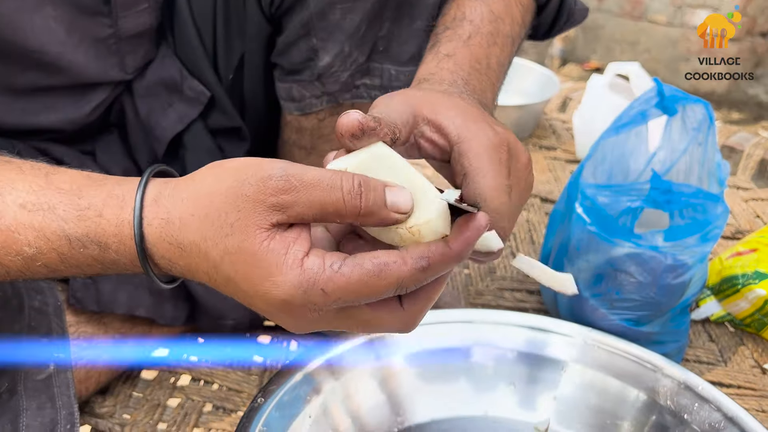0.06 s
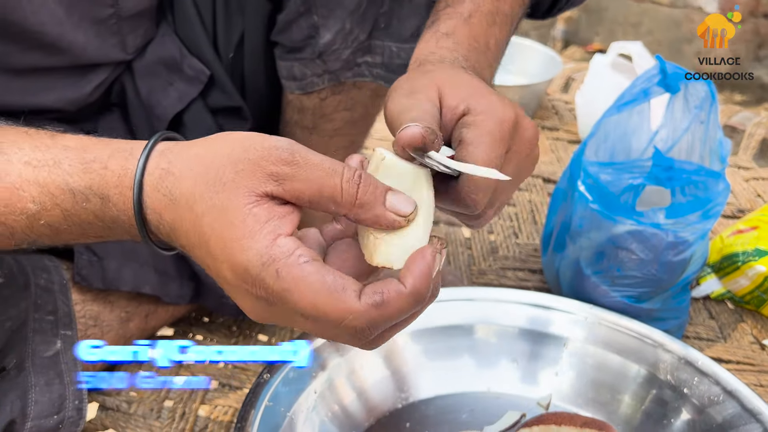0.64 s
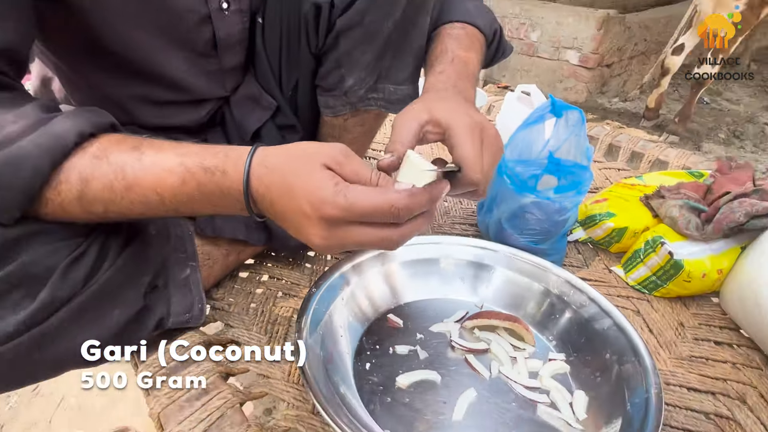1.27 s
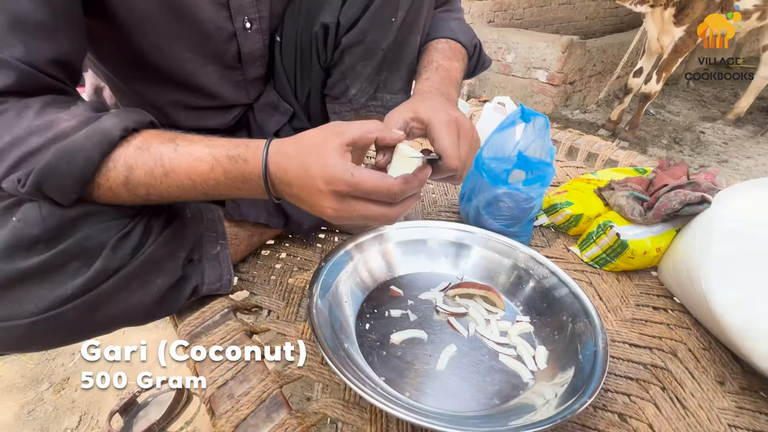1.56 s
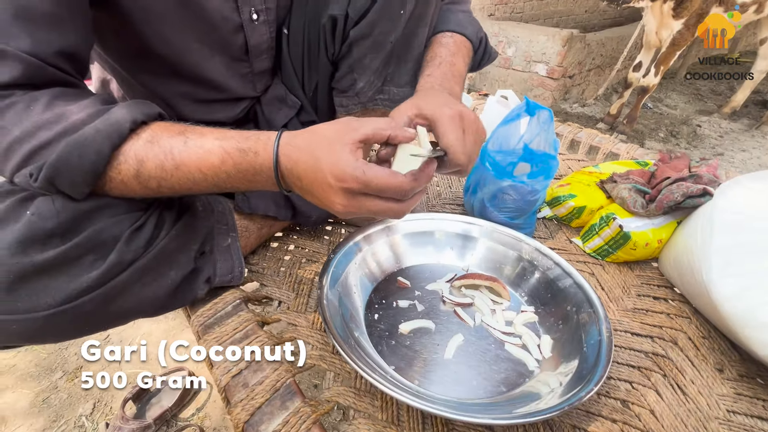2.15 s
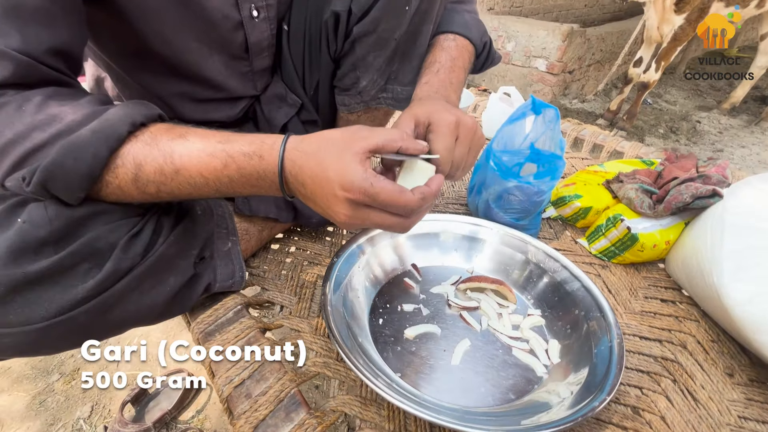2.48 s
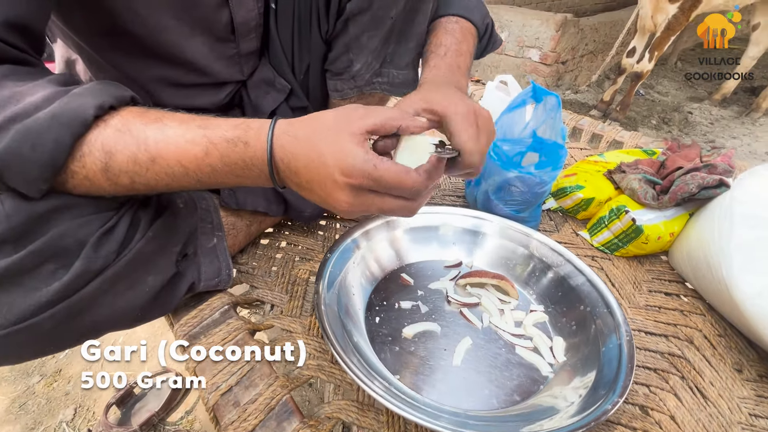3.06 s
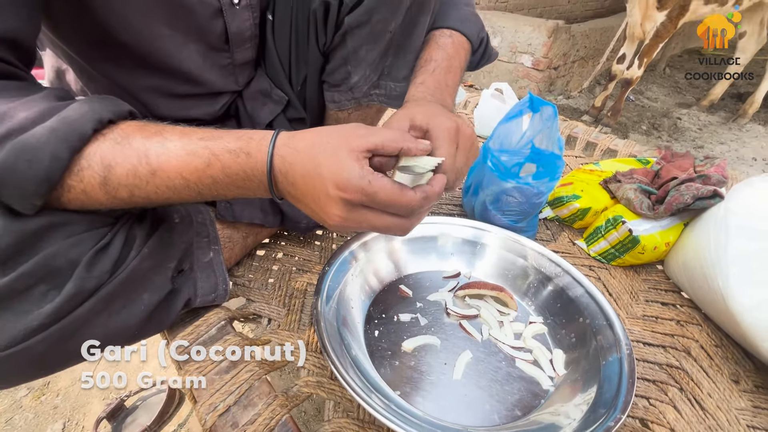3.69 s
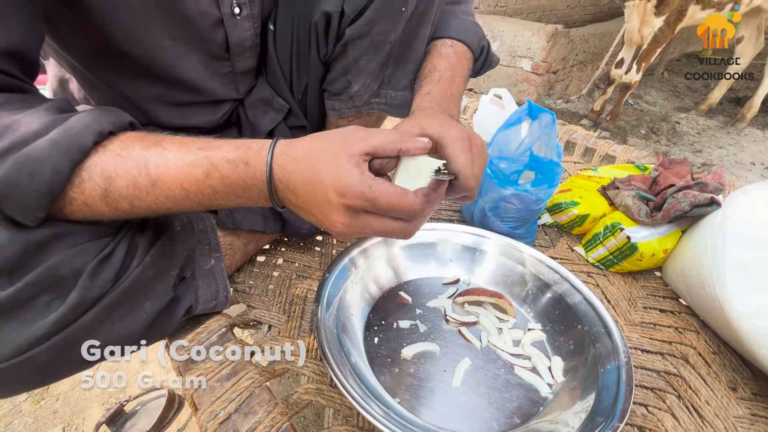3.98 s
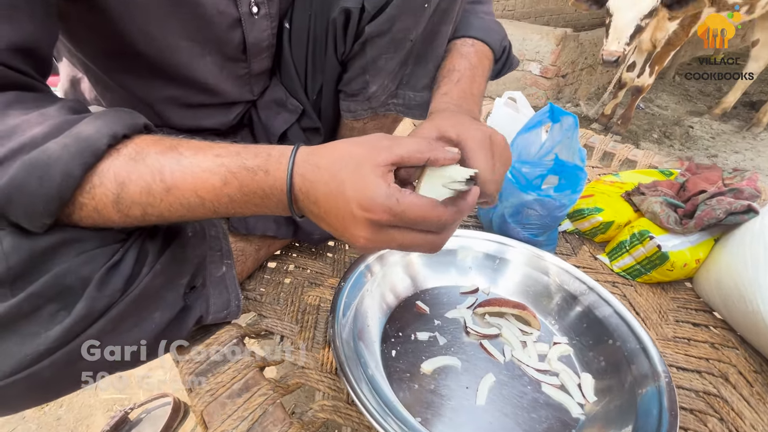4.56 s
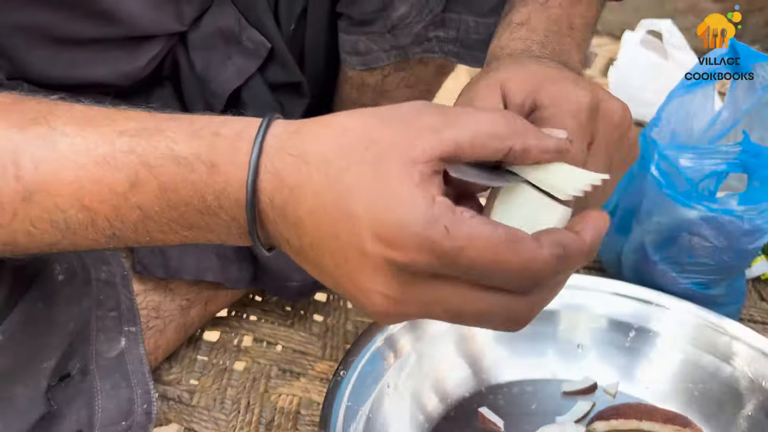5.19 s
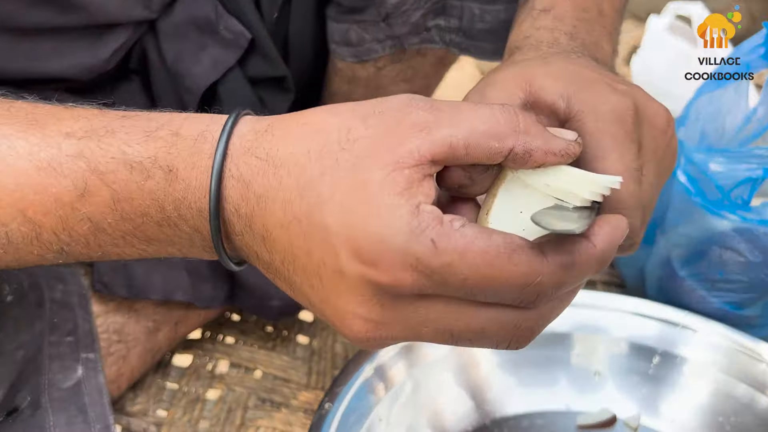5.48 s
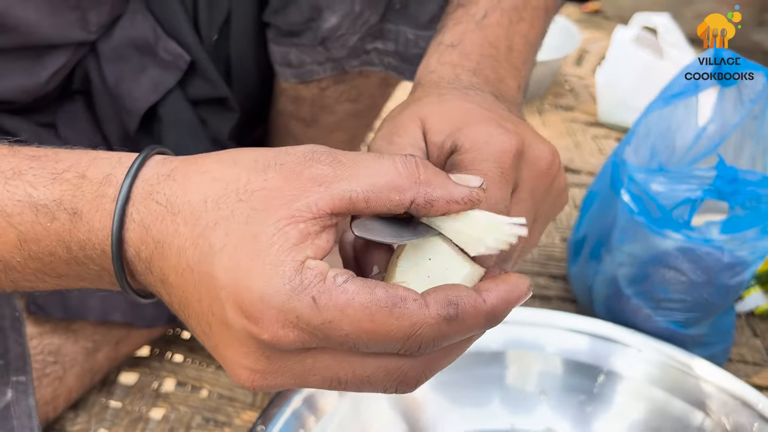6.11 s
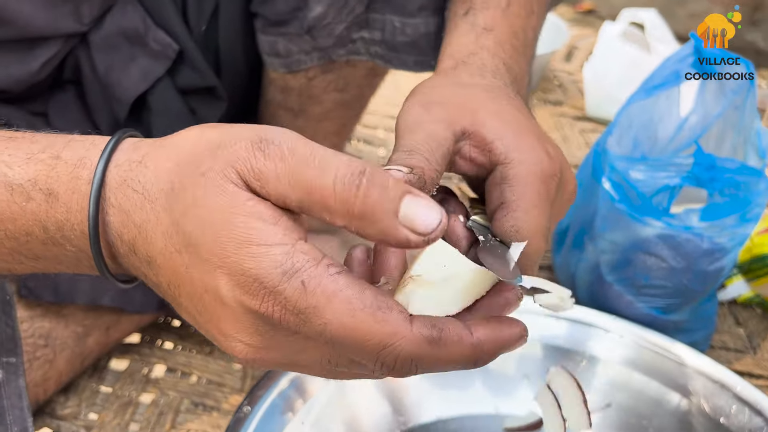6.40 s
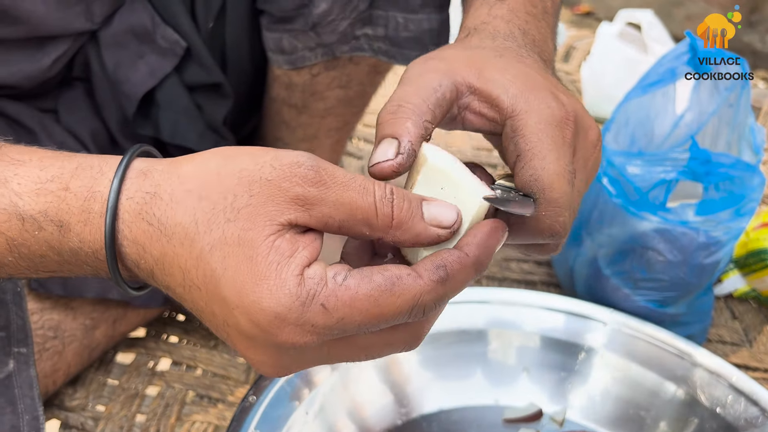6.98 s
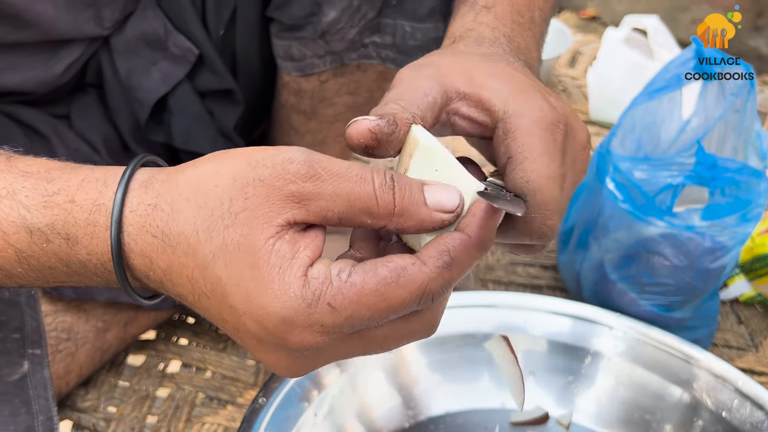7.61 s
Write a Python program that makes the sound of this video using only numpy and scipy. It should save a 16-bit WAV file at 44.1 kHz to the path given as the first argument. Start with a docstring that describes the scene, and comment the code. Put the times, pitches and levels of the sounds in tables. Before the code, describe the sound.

Crisp cuts into hard coconut and ringing clinks of pieces landing on a metal plate, outdoors among faint birds.

```python
"""In an open yard, small birds whistle over a low rumble while a small knife scrapes at dried coconut.
Slices drop onto a wide steel plate, bounce and leave it ringing, and a crow caws far away.
After a second the microphone steps back; the blade crunches on, snapping the hard fibres push by push.
Another slice lands, the birds get busier, and near 5 s the microphone comes close again.
At 6.5 s the heaviest piece makes the whole plate thump; one more cut and a last clink follow."""
import sys
import numpy as np
from scipy import signal
from scipy.fft import rfft, irfft
from scipy.io import wavfile
from scipy.ndimage import uniform_filter1d

SR = 44100
rng = np.random.default_rng(int(sys.argv[2]) if len(sys.argv) > 2 else 0)


def master(y):
    """Save y as 16-bit WAV."""
    cut = np.clip(np.atleast_2d(y).T, -1, 1)
    pcm = np.round(cut * 32767)  # scale
    wavfile.write(sys.argv[1], SR, pcm.astype(np.int16))


N = 346185

# Pushes of the blade, light or hard. Each row: start in seconds, length in seconds, force in dB.
BLADE_PUSHES = [(0.006, 0.073, -52.5), (.16, 0.15, -47), (0.425, 0.13, -49.5), (.63, .05, -61.5),
                (1.679, 0.22, -45), (2.201, 0.24, -46), (2.617, 0.22, -42.5), (2.96, 0.099, -60),
                (3.139, 0.18, -40.5), (3.413, 0.094, -60.5), (3.589, 0.18, -40), (3.82, 0.19, -65.5),
                (4.05, .15, -43), (4.377, 0.095, -58), (4.537, 0.16, -40.5), (4.889, 0.058, -51),
                (5.012, 0.16, -40.5), (5.284, 0.061, -44.5), (5.41, 0.22, -42.5), (5.68, 0.1, -67),
                (5.794, 0.05, -50), (5.965, 0.055, -57.5), (6.035, .1, -42.5), (7.32, 0.14, -41),
                (7.577, 0.059, -53)]
# Larger cracks ahead of the blade. Each row: start in seconds, relative peak level in dB.
COCONUT_CRACKS = [(.547, -49), (0.585, -43), (1.73, -40), (1.7822, -42), (1.887, -37), (1.9187, -32.5),
                  (2.252, -44.5), (2.877, -28.5), (3.2315, -35.5), (3.3443, -28.5), (3.796, -36),
                  (4.081, -34), (4.113, -34), (4.138, -39), (4.279, -29), (4.753, -34.5), (5.036, -41),
                  (5.3215, -33.5), (5.6275, -51), (5.6555, -30.5), (6.0548, -38), (6.0847, -33),
                  (6.119, -35), (7.261, -47.5), (7.289, -44), (7.321, -42.5), (7.355, -38), (7.383, -40.5),
                  (7.726, -43)]
# The tone of the crunch from nearby and from farther back. Each row: frequency in Hz, level in dB.
CRUNCH_NEAR = [(1470, -9), (2500, -9), (4370, -2.5), (7190, -2), (9080, -2.5), (9890, -16), (11800, -3),
               (13800, 0.5), (15200, -6), (16000, -4)]
CRUNCH_FAR = [(880, -14), (1500, -14.5), (2830, -6.5), (3590, -16.5), (4290, -6.5), (7690, -5), (9010, 3),
              (10800, -7), (13900, -4), (16000, -5)]


def cutting(level_db=-1.5, snaps_per_s=800, snap_s=0.0027, hiss=0.74, crack_db=-5, crack_s=0.0025):
    """Fibres part in a dense run of tiny snaps as the blade advances, with a larger crack now and then."""
    pressure = np.zeros((1, N))
    for start, length, force_db in BLADE_PUSHES:
        add(pressure, start, push(length, force_db))
    snaps = (rng.random(N) < snaps_per_s / SR) * amp(3 * np.minimum(rng.exponential(1, N), 3))
    grains = signal.lfilter([1], [1, -np.exp(-1 / (snap_s * SR))], snaps)  # each snap dies away
    loudness = unit(unit(grains) + hiss) * stick_slip() * pressure * amp(level_db)
    t = np.arange(2048) / SR
    crack = t / crack_s * np.exp(1 - t / crack_s)
    for start, db in COCONUT_CRACKS:
        add(loudness, start, amp(db + crack_db) * crack[None])
    far, noise = far_share(), stereo_noise(N, likeness=0.63)
    tone = (1 - far) * unit(colour(noise, CRUNCH_NEAR)) + far * unit(colour(noise, CRUNCH_FAR))
    crunch = loudness * tone
    return crunch + amp(-15) * yard_echo(crunch, t60=0.063)


def push(length, force_db, soft_start_db=-21, build_share=0.59, release_db_per_s=643.5):
    """Pressure on the blade builds, holds, and drops when the coconut gives way."""
    t = np.arange(0, length + .1, 1 / SR)
    still_to_build = np.maximum(1 - t / (build_share * length), 0)
    release_db = release_db_per_s * np.maximum(t - length, 0)
    return amp(force_db + soft_start_db * still_to_build - release_db)[None]


def stick_slip(depth_db=3.5):
    """The blade catches and lets go every few milliseconds."""
    return unit(amp(depth_db * unit(uniform_filter1d(rng.standard_normal(N), 260))))


# Slices landing and bouncing. Each row: start in seconds, then strength, weight of the flat face,
# sharpness of the edge and long ring, all in dB. Lying flat muffles the ring; a hit near the rim frees it.
SLICE_LANDINGS = [(0.2425, -44.5, 9.5, 0, 4), (0.254, -35, -20, -2, 0), (0.3053, -22, -9.5, 6.5, -1),
                  (0.319, -27.5, -27, 5.5, 2.5), (0.373, -43.5, 2.5, 8, -12), (1.013, -35.5, 6, -7.5, -4),
                  (1.0205, -20, -14.5, 1.5, -7), (1.0615, -26, -7.5, 5.5, -1.5),
                  (1.16, -36.5, -15, -22, 14), (1.262, -41, -15.5, -18, -15), (1.308, -44, -12.5, -12, 11),
                  (2.4243, -16.5, -5, -9, -3), (2.544, -47, 10.5, 9, -1), (2.562, -21.5, -19.5, -2.5, -8),
                  (2.636, -49, -0.5, 17, 1.5), (2.692, -44, -5, 3.5, 21), (6.513, -46, 2, -1, 0),
                  (6.5275, -17.5, -17.5, -6.5, 9.5), (6.5362, -13.5, -11, -1, 8),
                  (6.585, -24.5, -8, 5.5, 1.5), (6.606, -10.5, -18.5, -14.5, -9.5),
                  (6.695, -39.5, -5.5, 10.5, -4), (6.8605, -38, -3.5, -2.5, -6), (6.942, -53, -1, 3.5, -11),
                  (7.7492, -21, -13.5, 4.5, -10), (7.768, -52, -6, 31, 6)]
# The thud, knock, clank, clink and tick of a landing. Each row: lowest and highest frequency in Hz.
LANDING_BANDS = [(150, 380), (380, 1200), (1200, 3500), (3500, 9000), (9500, 16500)]
# How those five bands answer a hit. Each row: level in dB, share of the weight, share of the sharpness,
# left minus right in dB.
BAND_ANSWERS = [(-11.5, 0.73, 0.2, -0.5), (0, 0.96, 0, 4.5), (2, 0.055, 0.015, 0.5), (0, 0, 0.99, 1),
                (-7, 0.013, 0.76, -0.2)]


def landings(level_db=-1.9, rise_s=0.0009, chatter=0.12, chatter_s=0.011, tap_db=2, tap_s=0.00058):
    """Each slice rings the plate: a hard edge brings out the treble, a flat face the low notes."""
    out, t = np.zeros((2, N)), np.arange(1 << 15) / SR
    hz, mode_db, t60, waves = plate_modes(t)
    lasting = np.minimum(t60 / .42, 1) ** 2  # notes lasting 0.42 s or more are muffled or freed fully
    fade_in_out = (1 - np.exp(-t / rise_s)) * np.minimum(1, 10 * (t[-1] - t))
    for start, strength_db, weight_db, sharp_db, ring_db in SLICE_LANDINGS:
        ring = plate_ring(t, hz, mode_db + ring_db * lasting, waves) * fade_in_out
        ring += amp(tap_db) * np.exp(-t / tap_s) * rng.standard_normal(len(t))
        # a curved slice touches again a few milliseconds after it lands
        delay = int(chatter_s * rng.uniform(.5, 1) * SR)
        ring += chatter * np.pad(ring, ((0, 0), (delay, 0)))[:, :len(t)]
        for (lo, hi), (db, by_weight, by_edge, left_db) in zip(LANDING_BANDS, BAND_ANSWERS):
            gain = amp(strength_db + db + by_weight * weight_db + by_edge * sharp_db)
            balance = amp([[left_db / 2], [-left_db / 2]])
            add(out, start, gain * balance * unit_attack(band(ring, lo, hi)))
    return out * amp(level_db)


# The plate's clear notes (modes). Each row: pitch in Hz, relative level in dB,
# seconds to fade by 60 dB (called t60).
CLEAR_MODES = [(200, -13, 0.1), (535, -13, 0.22), (1130, -7, 0.08), (1432, -5, 0.09), (1787, 0, 0.12),
               (1829, 2.5, 0.13), (1959, -13, 0.55), (2005, -7, 0.33), (2085, -3, 0.24), (2116, -17, 0.7),
               (2288, -4, 0.1), (2508, -6, 0.08), (2622, -1, 0.13), (2671, -2, 0.13), (2988, -23, 0.6),
               (3054, -4, 0.14), (3453, -7, 0.13), (3499, -5, 0.14), (3622, -11, 0.25), (3639, -27, 1.6),
               (3815, -12, 0.2), (3822, -33, 1.1), (4265, -6, 0.13), (4549, -2, 0.18), (4705, 0, 0.16),
               (4975, -5, 0.25), (5230, -3, 0.17), (5566, -13, 0.37), (5967, -7, 0.2), (6469, -5, 0.16),
               (7199, -6, 0.22), (7505, -7, 0.2), (8027, -19, 0.42), (8619, -5, 0.15)]
# The tone of its crowd of weaker notes. Each row: frequency in Hz, relative level in dB.
CROWD_TONE = [(88, -41), (150, -18.5), (222, -3.5), (431, -33.5), (534, -11.5), (820, -21.5), (1100, -20),
              (1600, -16), (1790, -2), (2650, -9), (2810, -18.5), (4860, -8), (7470, -15), (10000, -29.5),
              (12900, -28.5), (16000, -35)]
# How long that crowd rings. Each row: frequency in Hz, typical t60 in seconds.
CROWD_FADE = [(200, 0.11), (1000, 0.062), (2500, 0.061), (5500, 0.45), (9000, 0.39), (14000, 0.039)]


def plate_modes(t, count=320, crowd_db=-13, scatter_db=4, t60_scatter=0.12):
    """Steel rings at many pitches at once, each a fading wave in a sine and a cosine version."""
    hz = rng.uniform(500, 16000, count)
    peak_db = max(db for _, db in CROWD_TONE)
    db = crowd_db + read(CROWD_TONE, hz) - peak_db + scatter_db * rng.standard_normal(count)
    t60 = read(CROWD_FADE, hz) * np.exp(t60_scatter * np.clip(rng.standard_normal(count), -2, 2))
    hz, db, t60 = np.vstack([CLEAR_MODES, np.transpose([hz, db, t60])]).T
    angle = np.float32(2 * np.pi * np.outer(hz, t))
    decay = np.exp(np.float32(-np.log(1000) * np.outer(1 / t60, t)))
    return hz, db, t60, np.vstack([np.sin(angle) * decay, np.cos(angle) * decay])


def plate_ring(t, hz, db, waves, uneven_db=3, crack_s=0.011, wash_t60=0.087, linger_t60=0.37):
    """One hit on the plate; a random mix of its notes stands for the spot that is struck."""
    size = amp(db + uneven_db * rng.standard_normal(len(hz)))
    spread = 1 + (hz / 16000) ** 2  # short waves reach the two ears less alike
    phase = rng.uniform(0, 2 * np.pi, len(hz)) + spread * rng.uniform(-0.9, 1, (2, len(hz)))
    ring = np.float32(np.hstack([size * np.cos(phase), size * np.sin(phase)])) @ waves
    # the crack of the contact, then its scatter from the surroundings
    crack = amp(5) * np.exp(-t / crack_s)
    scatter = amp(-9 - 60 * t / wash_t60) + amp(-26 - 60 * t / linger_t60)
    noise = unit(colour(stereo_noise(len(t), likeness=0.61), CROWD_TONE))
    return unit_attack(ring) + noise * (crack + scatter)


# Thumps from the heaviest piece. Each row: start in seconds, level in dB.
PLATE_THUMPS = [(6.531, -32.5), (6.584, -25.5), (6.605, -25)]


def thumps(hz=205, rise_s=.004, t60=.13):
    """The whole plate rocks against the woven cot under it: a low note that dies quickly."""
    out, t = np.zeros((2, N)), np.arange(SR // 4) / SR
    note = np.sin(2 * np.pi * hz * t) * (1 - np.exp(-t / rise_s)) * amp(-60 * t / t60)
    for start, db in PLATE_THUMPS:
        add(out, start, amp(db) * note[None])
    return out


# The microphone steps back and aside. Each row: time in seconds, position from 0 (close) to 1 (far).
MIC_PATH = [(1.1, 0), (1.3, 1), (4.85, 1), (5.1, 0)]


def far_share():
    """How far the microphone has moved away at each moment."""
    return np.interp(np.arange(N) / SR, *np.transpose(MIC_PATH))


# The microphone's two openings. Each row: frequency in Hz, radians by which the left one is ahead.
LEFT_LEAD = [(700, 0), (1400, -1.1), (2100, .1), (4400, .6), (7100, 0), (9700, -3.1), (12700, -6.1),
             (14000, -6.6), (16000, -9.4)]
# The balance at the far position. Each row: frequency in Hz, left minus right in dB.
FAR_BALANCE = [(300, -7), (900, 13.5), (2000, 4.5), (4000, 2), (7000, -4), (9200, -13.5), (12000, -0.5)]


def microphone(x, lag_s=.000455, lag_below_hz=8790):
    """The two sides hear a little out of step; from afar, all but the top treble reaches the right late."""
    hz, left_right = np.fft.rfftfreq(N, 1 / SR), np.array([[.5], [-.5]])
    close = rfft(x) * np.exp(1j * read(LEFT_LEAD, hz) * left_right)
    lag_phase = 2 * np.pi * lag_s * np.minimum(hz, lag_below_hz)
    aside = close * np.exp(1j * lag_phase * left_right) * amp(read(FAR_BALANCE, hz) * left_right)
    far = far_share()
    return (1 - far) * irfft(close, N) + far * irfft(aside, N)


# The shape of each named chirp. Each row: seconds into the chirp, base pitch in Hz, relative level in dB.
CHIRP_SHAPES = { "swoop": [(0, 6420, -9), (.025, 6100, -7), (.065, 5600, 1.5), (.1, 5393, 3.5),
                (.138, 6640, 6), (.155, 6060, 0.5), (.175, 5000, -11.5)], "hook": [(0, 3250, -22),
                (.025, 3600, -8), (.055, 3900, -6), (.068, 4650, -6), (.076, 5400, -32), (.087, 6700, -32),
                (.093, 6500, -6), (.11, 5400, 1), (.125, 4850, -6), (.135, 4800, -22)],
                "twitter": [(0, 3000, -20), (.012, 3750, -7), (.026, 4700, -5), (.046, 4500, 1),
                (.054, 3750, -4), (.063, 4200, -12), (.072, 4300, 2), (.095, 3800, 1), (.121, 3000, -12)],
                "rise": [(0, 3800, -5), (.035, 4600, 0), (.07, 6200, 1), (.095, 6700, -1)],
                "peep": [(0, 4750, -10), (.025, 4950, 0), (.06, 5200, -4)], "pipe": [(0, 3050, -8),
                (.025, 3050, 0), (.07, 3020, -4), (.17, 3000, -12)], "chup": [(0, 1870, 4),
                (.006, 1200, -3), (.016, 750, -11)], }
# Each chirp's perch and voice. Each entry: share of yard echo, rasp as a share of the pitch.
CHIRP_VOICES = {"swoop": (.3, .006), "hook": (.2, .008), "twitter": (.25, .04), "rise": (.88, .025),
                "peep": (.85, .012), "pipe": (.5, .002), "chup": (.2, .16)}
# The birdsong. Each row: start in seconds, chirp name, level in dB, pitch multiplier.
BIRD_CHIRPS = [(-.135, "swoop", -50.5, 1), (0.083, "hook", -36.5, 0.97), (.74, "twitter", -44.5, 0.98),
               (1.36, "pipe", -50, 0.97), (1.65, "pipe", -52.5, 0.93), (1.952, "pipe", -52.5, 1.05),
               (2.189, "peep", -49.5, 0.84), (2.246, "pipe", -49, 1.0), (2.363, "chup", -48, 1),
               (2.96, "peep", -61, 1.07), (3.104, "twitter", -38, 1.014), (3.559, "swoop", -41, .97),
               (3.772, "hook", -33.5, 0.97), (4.219, "rise", -58.5, 1.24), (4.389, "rise", -55, 1.11),
               (4.52, "peep", -48.5, 1.19), (4.604, "twitter", -34, 1.005), (4.728, "rise", -49, 1.08),
               (4.87, "peep", -44, 1.03), (4.877, "rise", -45.5, .96), (5.066, "peep", -40.5, 1.02),
               (5.253, "peep", -40.5, 1.015), (5.427, "rise", -49.5, 1.02), (5.639, "rise", -50, 1.02),
               (5.688, "twitter", -37, 1.043), (5.808, "rise", -51, 0.97), (5.968, "rise", -51, 0.97),
               (6.153, "rise", -51.5, 0.96), (6.32, "rise", -55, 0.95), (7.168, "chup", -48, 0.55),
               (7.203, "chup", -52, 0.74), (7.506, "chup", -47, 0.53), (7.543, "chup", -49, 0.56)]


def birds(level_db=-1, waver=.025, flutter_db=2.8, overtone_db=-33, far_db=-2, left_db=1):
    """Small birds sing nearly pure gliding whistles; the farther ones arrive blurred, mostly as echo."""
    direct, near, far = np.zeros((3, 2, N))
    for start, name, db, pitch in BIRD_CHIRPS:
        when, hz, shape_db = np.transpose(CHIRP_SHAPES[name])
        echo, rasp = CHIRP_VOICES[name]
        t = np.arange(0, when[-1], 1 / SR)
        buzz = unit(band(rng.standard_normal(len(t)), 300, 900))
        wobble, flutter = unit(uniform_filter1d(rng.standard_normal((2, len(t))), 150, axis=1))
        glide_hz = pitch * np.interp(t, when, hz) * (1 + waver * echo * wobble + rasp * buzz)
        phase = 2 * np.pi * np.cumsum(glide_hz) / SR
        whistle = np.sin(phase) + amp(overtone_db) * np.sin(2 * phase)
        loudness = amp(db + np.interp(t, when, shape_db) + flutter_db * echo * flutter)
        note = (whistle * loudness * signal.windows.tukey(len(t), .1))[None]
        add(direct, start, np.sqrt(1 - echo) * note)
        add(near, start, np.sqrt(echo * (1 - echo ** 2)) * note)
        add(far, start, np.sqrt(echo) * echo * note)
    echoes = amp(far_db) * yard_echo(far, t60=.4) + yard_echo(near, t60=0.083)
    return amp(level_db) * (direct + echoes) * amp([[left_db], [-left_db]])


# The crow's calls. Each row: start in seconds, length in seconds, level in dB.
CROW_CAWS = [(.44, 0.27, -53.5), (1.643, 0.17, -54), (5.355, 0.25, -52.5)]
# The tone of a caw. Each row: frequency in Hz, level in dB.
CAW_TONE = [(700, -26), (1200, -12), (1500, -3), (1850, 3), (2200, -10), (3000, -30), (8000, -70)]


def crow():
    """Hoarse caws from so far away that only their blurred echo arrives."""
    out = np.zeros((1, N))
    for start, length, db in CROW_CAWS:
        count = int(length * SR)
        rasp = unit(colour(rng.standard_normal((1, count)), CAW_TONE))
        add(out, start, amp(db) * rasp * signal.windows.tukey(count, .5))
    return yard_echo(out, t60=0.34)


# The tone of the open air. Each row: frequency in Hz, relative level in dB.
AIR_TONE = [(15, -34.5), (25, -9.5), (97, 0.5), (175, -17), (489, -27), (677, -26.5), (1700, -32),
            (2760, -39.5), (3080, -37), (3340, -43), (6380, -43.5), (7510, -56), (9070, -57.5),
            (12500, -56), (16000, -58)]
# How alike the air sounds in both ears. Each row: frequency in Hz, likeness from 0 to 1.
AIR_LIKENESS = [(50, 1), (130, 0.34), (300, 0.53), (700, 0.015), (3000, 0.28), (12000, 0.095)]
# Its slow drift. Each row: time in seconds, relative hiss level in dB, relative rumble level in dB.
AIR_SWELL = [(0.0, -62, -45), (2.32, -62.5, -45.5), (2.58, -57, -47), (2.97, -64, -47), (4.5, -63.5, -44.5),
             (4.77, -63, -47.5), (5.84, -64, -45.5), (7.3, -67, -47.5), (7.85, -64, -49.5)]


def air(rumble_db=4, hiss_db=2, patchy_db=2.0, split_hz=300, low_cut_hz=40):
    """The outdoor background: a lumpy low rumble under a faint hiss, both swelling slowly."""
    frames, hz = N // 512 + 5, np.fft.rfftfreq(2048, 1 / SR)
    a, b, c, d, patches = rng.standard_normal((5, len(hz), frames))
    likeness = read(AIR_LIKENESS, hz)[:, None]
    left = a + 1j * b
    right = likeness * left + np.sqrt(1 - likeness ** 2) * (c + 1j * d)
    patches = unit(uniform_filter1d(uniform_filter1d(patches, 20, axis=0), 8, axis=1))
    spectra = np.array([left, right]) * amp(read(AIR_TONE, hz)[:, None] + patchy_db * patches)
    low = 1 / (1 + (hz[:, None] / split_hz) ** 4)
    rumble, hiss = (signal.istft(spectra * share, nperseg=2048, noverlap=1536)[1][:, :N]
                    for share in (low, 1 - low))
    when, *levels = np.transpose(AIR_SWELL)
    hiss_swell, rumble_swell = (amp(np.interp(np.arange(N) / SR, when, db)) for db in levels)
    rumble = unit(band(rumble, low_cut_hz, 2000))
    hiss = hiss / np.std(band(hiss, 550, 1400))
    return amp(rumble_db) * rumble_swell * rumble + amp(hiss_db) * hiss_swell * hiss


def yard_echo(x, t60):
    """Scattered echoes from walls and ground, different at each ear."""
    t = np.arange(SR // 2) / SR
    bounces = rng.standard_normal((2, len(t))) * (rng.random((2, len(t))) < .05)
    bounces *= amp(-60 * t / t60) * (t > .004)
    return signal.fftconvolve(x, unit(bounces) / np.sqrt(len(t)), axes=1)[:, :N]


def amp(db):
    """Turns decibels into a volume multiplier."""
    return 10 ** (np.asarray(db) / 20)


def unit(x):
    """Scales a sound to an average (rms) level of 1."""
    return x / np.sqrt(np.mean(x ** 2) + 1e-20)


def unit_attack(x):
    """Scales a sound so its first 10 milliseconds have an average (rms) level of 1."""
    return x / np.sqrt(np.mean(x[:, :SR // 100] ** 2))


def read(points, hz):
    """Looks up a frequency between a table's rows, spacing octaves evenly."""
    row_hz, value = np.transpose(points)
    return np.interp(np.log(hz + 1), np.log(row_hz), value)


def add(mix, start_s, sound):
    """Mixes a sound in at a given time."""
    start = round(start_s * SR)
    sound = sound[:, max(-start, 0):]
    part = mix[:, max(start, 0):][:, :sound.shape[1]]
    part += sound[:, :part.shape[1]]


def stereo_noise(count, likeness):
    """Left and right noises that are partly alike."""
    left, other = rng.standard_normal((2, count))
    return np.array([left, likeness * left + np.sqrt(1 - likeness ** 2) * other])


def colour(x, tone):
    """Turns each frequency up or down as a tone table says."""
    hz = np.fft.rfftfreq(x.shape[-1], 1 / SR)
    return irfft(rfft(x) * amp(read(tone, hz)), x.shape[-1])


def band(x, lo, hi):
    """Keeps the frequencies between lo and hi Hz."""
    return signal.sosfilt(signal.butter(N=4, Wn=[lo, hi], btype="band", fs=SR, output="sos"), x)


def scene():
    """Plate and knife at the moving microphone, with birds, crow and open air behind."""
    return microphone(landings() + thumps() + cutting()) + birds() + crow() + air()


def record(dry):
    """The recorder rounds off the tallest peaks and cuts the highest treble."""
    ceiling, top_hz = .9, 16100
    rounded = dry / (1 + (dry / ceiling) ** 6) ** (1 / 6)
    low_pass = signal.firwin(201, top_hz, window=("kaiser", 9), fs=SR)
    return signal.oaconvolve(rounded, low_pass[None], "same")


dry = scene()
out = record(dry)
master(out)
```